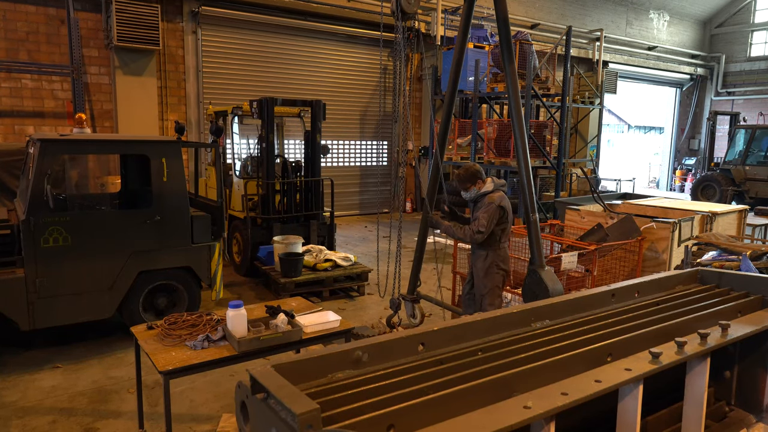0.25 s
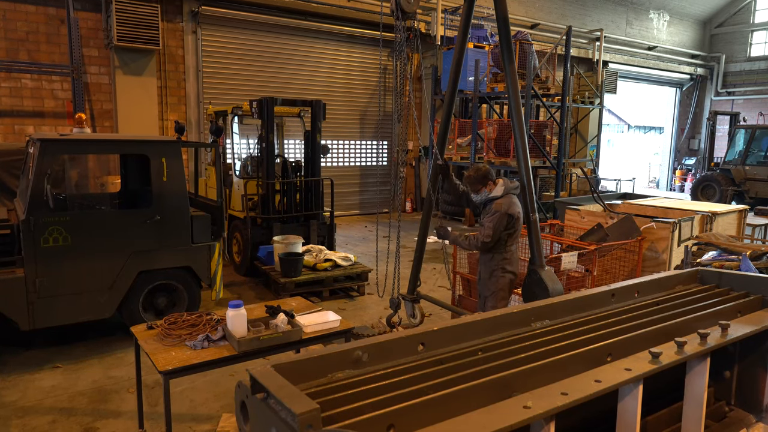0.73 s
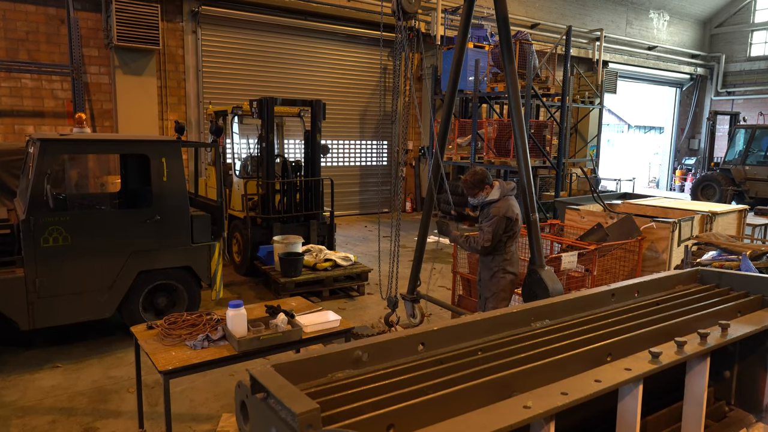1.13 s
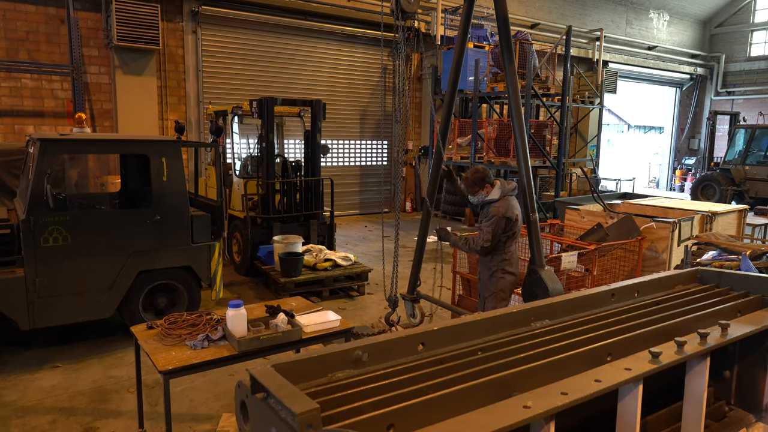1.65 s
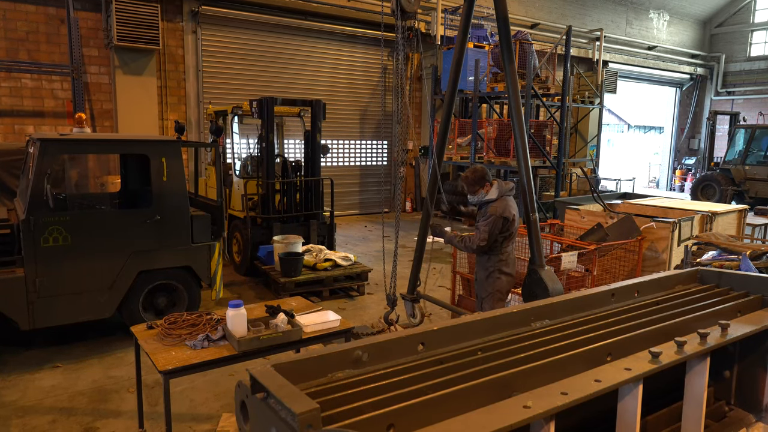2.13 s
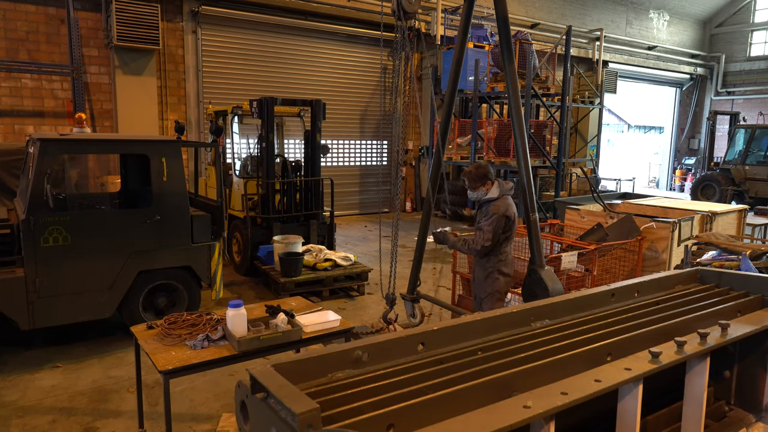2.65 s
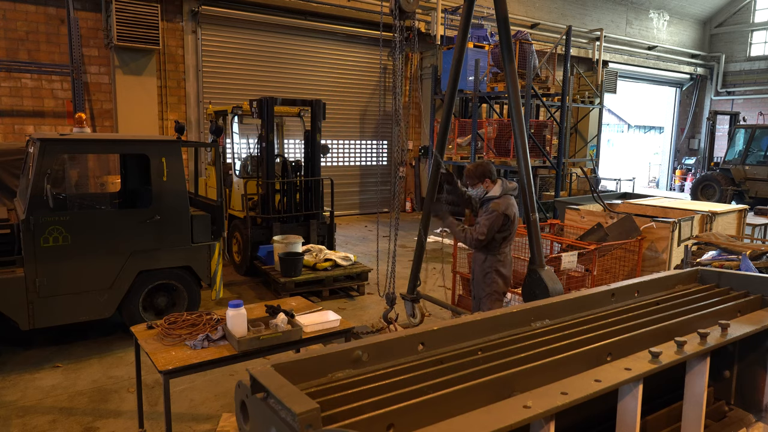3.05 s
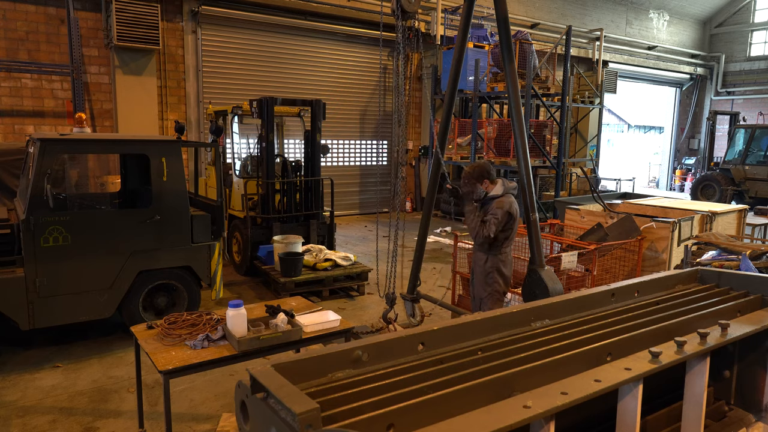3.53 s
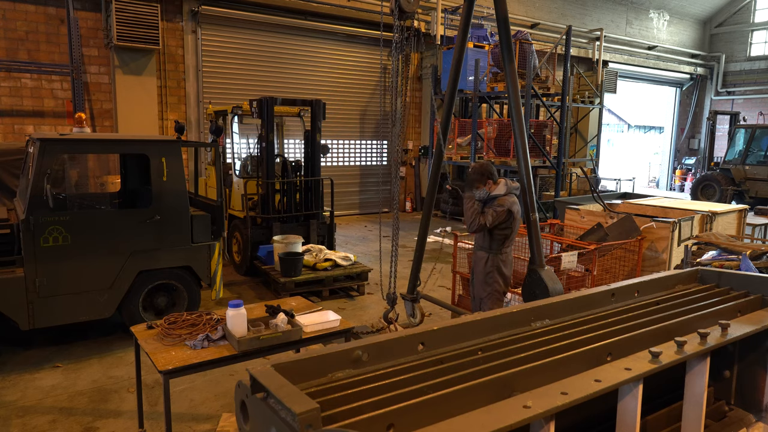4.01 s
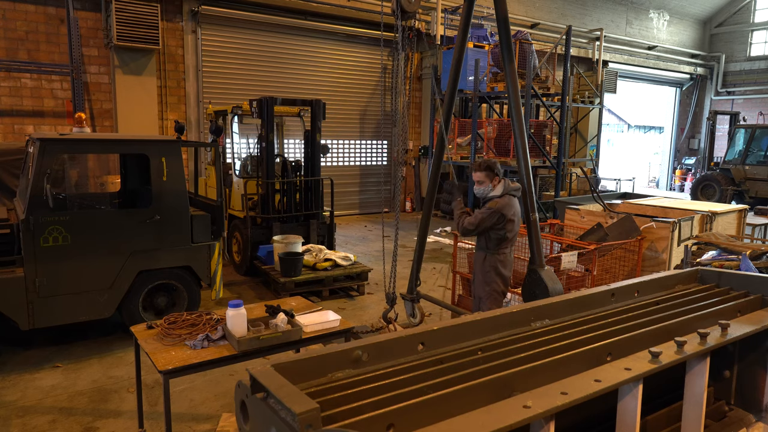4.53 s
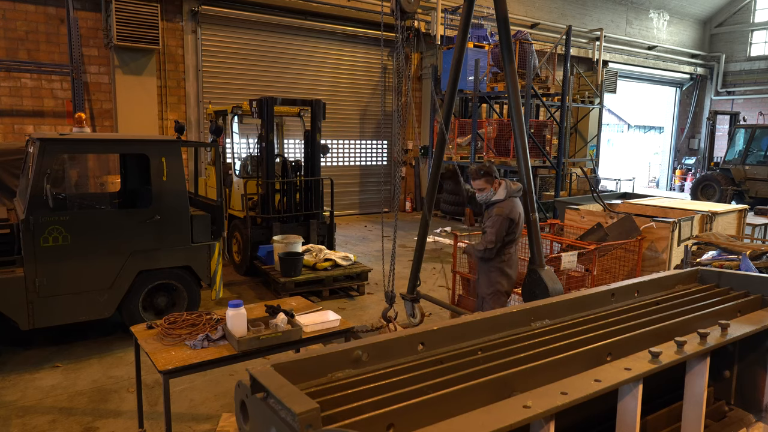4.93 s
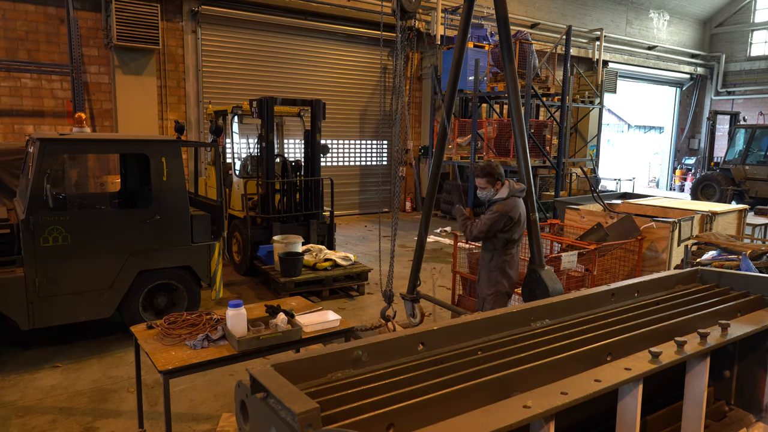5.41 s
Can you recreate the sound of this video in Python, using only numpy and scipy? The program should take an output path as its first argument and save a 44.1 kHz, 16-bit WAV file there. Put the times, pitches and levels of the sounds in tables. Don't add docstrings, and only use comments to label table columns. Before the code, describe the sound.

Metal chain rattle starts almost at once, joined by a pawl clicking in bursts that speed up and slow down with each pull. Hard clinks and hollow tube knocks stand out, especially around two seconds. After a slowing run there is a near-silent pause with small link ticks, then a vigorous clatter to the end. Close, dry detail sits in a big hard-walled hall.

```python
import sys
import numpy as np
from scipy import signal
from scipy.fft import rfft, irfft, next_fast_len
from scipy.io import wavfile
from scipy.ndimage import uniform_filter1d

SR = 44100
rng = np.random.default_rng(int(sys.argv[2]) if len(sys.argv) > 2 else 0)


def to_linear_factor(level_db):
    exponent = np.asarray(level_db, float) / 20
    return 10 ** exponent


def output_pcm(signal):
    pcm = np.clip(np.atleast_2d(signal).T, -1, 1) * 32767
    wavfile.write(sys.argv[1], SR, np.round(pcm).astype(np.int16))


N = 250047


def evened(x):
    return x / np.sqrt(np.mean(x ** 2) + 1e-20)


def read(points, hz):
    f, value = np.transpose(points)
    return np.interp(np.log(hz + 1), np.log(f + 1), value)


def coloured(x, points):
    size = next_fast_len(len(x))
    gain = to_linear_factor(read(points, np.fft.rfftfreq(size, 1 / SR)))
    return irfft(rfft(x, size) * gain, size)[:len(x)]


def above(x, hz):
    return signal.sosfilt(signal.butter(4, hz, "high", fs=SR, output="sos"), x)


def blows(s, size):
    train = np.zeros(N)
    at = np.clip((np.asarray(s) * SR).astype(int), 0, N - 1)
    np.add.at(train, at, size)
    return train


def ring(x, hz, t60):
    r = 1000 ** (-1 / (abs(t60) * SR))
    w = 2 * np.pi * hz / SR
    return signal.lfilter([np.sin(w)], [1, -2 * r * np.cos(w), r * r], x)


def burst(train, t60):
    power = signal.lfilter([1], [1, -1000 ** (-2 / (abs(t60) * SR))], train ** 2)
    return np.sqrt(power) * rng.standard_normal(N)


# frequency in Hz, level in dB.
AIR = [(15, -9.5), (28, 5), (45, -6.5), (60, -11.5), (100, -13), (150, -17.5), (300, -14.5), (700, -16),
       (2000, -28), (4000, -44), (6000, -37), (10000, -44), (16000, -54)]
HUM = [0, -10, -1, 4, -6]
# time in seconds, level in dB.
MOTOR = [(0.0, -73), (0.39, -64), (0.6, -90), (0.95, -73), (1.67, -65), (2.59, -72), (2.76, -93),
         (3.03, -66), (3.87, -66), (4.12, -86), (4.25, -74), (4.59, -68), (5.23, -69), (5.48, -65),
         (5.67, -78)]


def air():
    t = np.arange(N) / SR
    hum_hz = 79.4
    hum = sum(to_linear_factor(db) * np.sin(2 * np.pi * hum_hz * (k + 1) * t + k) for k, db in enumerate(HUM))
    still = evened(coloured(rng.standard_normal(N), AIR))
    return to_linear_factor(-58.5) * still + to_linear_factor(np.interp(t, *np.transpose(MOTOR))) * hum


# time in seconds, speed in teeth a second.
PULLS = [
    [(.106, 28), (.333, 58.4), (.463, 70.9), (.793, 42.6), (.908, 27.7)],
    [(.9085, 31.5), (1.043, 59.5), (1.279, 62.9), (1.561, 25.9), (1.716, 11.5)],
    [(1.7165, 17.8), (1.948, 80.4), (2.088, 92.2), (2.119, 79.2), (2.52, 39.9)],
    [(2.52, 38.4), (2.724, 79.2), (3.085, 35.6), (3.208, 18.8), (3.319, 15.1), (3.474, 11.3)],
    [(4.45, 12.6), (4.649, 63.9), (4.79, 65.7), (4.82, 76.5), (4.994, 88.5), (5.3, 53.7)],
    [(5.3, 68.4), (5.461, 86.6), (5.665, 65.5)],
]


def running(t):
    return sum(np.interp(t, *np.transpose(pull), left=0, right=0) for pull in PULLS) / 60


LAST_TEETH = [
    3.4745,
    4.2483,
    5.665,
]
UNEVEN_S = .001


def teeth():
    times = [LAST_TEETH]
    for pull in PULLS:
        t = np.arange(pull[0][0], pull[-1][0], 1 / SR)
        turned = np.cumsum(np.interp(t, *np.transpose(pull))) / SR
        times.append(np.interp(np.arange(round(turned[-1])), turned, t))
    s = np.sort(np.concatenate(times))
    return s + UNEVEN_S / np.gradient(s) / 60 * rng.standard_normal(len(s))


# frequency in Hz, level in dB.
LINKS = [(1200, -57), (1700, -14), (2130, -9), (2650, -5.5), (3200, 0.5), (3700, 2.5), (4250, -3.5),
         (4800, -5), (5500, -15.5), (7000, -29)]


def clink(hz, t60, luck):
    t = np.arange(4096) / SR
    tones = 0
    for f, db, phase in zip(hz, read(LINKS, hz), luck):
        tones = tones + to_linear_factor(db - 60 * t / t60) * np.sin(2 * np.pi * (f * t + phase))
    return tones * (1 - np.exp(-t / .0002))


# time in seconds, rattle in dB without the wheel's share.
CHAIN = [(0, -55.5), (.08, -58), (.16, -42.5), (.62, -36), (.9, -40.5), (1.39, -35.5), (1.7, -42.5),
         (2.03, -31.5), (2.16, -39), (2.83, -37), (3.1, -38.5), (3.3, -44.5), (3.6, -50.5), (4.07, -66.5),
         (4.27, -71), (4.36, -60), (4.58, -37.5), (5.67, -35)]
# frequency in Hz, level in dB.
RUMBLE = [(59, -62), (100, -18.5), (260, -5.5), (452, -23), (744, -12), (923, -10.5), (1080, -2.5),
          (1350, -7.5), (2500, -5.5), (3250, -37), (5500, -120)]
LEG_HZ = [258, 522, 660, 762, 1083, 1452, 1725, 2122, 2385, 2466, 2842]
# level in dB, t60 in seconds.
LEG = [(2.5, 0.027), (-7, 0.27), (6, 0.015), (-7.5, 0.17), (0, .22), (-37, 0.082), (-8.5, 0.044),
       (-4, 0.22), (-6.5, 0.15), (-2.5, 0.12), (-19.5, 0.14)]
CLINKS_PER_S, CLINK_SPREAD_DB, LINK_T60 = 230, 2.8, .025
JOLT = 0.42
RUN_DB = 1.5
FRAME_DB, FRAME_SHARE, FRAME_RUN_DB = -38.5, 0.46, 7.5


def chain(tooth_s):
    t = np.arange(N) / SR
    swing_db = np.interp(t, *np.transpose(CHAIN))
    run = uniform_filter1d(running(t), size=2000)
    level = to_linear_factor(swing_db + RUN_DB * run)
    frame_level = to_linear_factor(FRAME_DB + FRAME_SHARE * swing_db + FRAME_RUN_DB * np.minimum(run / .4, 1))

    strength = to_linear_factor(CLINK_SPREAD_DB * np.minimum(rng.exponential(1, N), 4))
    knocks = strength * (rng.random(N) < CLINKS_PER_S / SR)
    jolts = signal.lfilter([1], [1, -np.exp(-1 / (0.0093 * SR))], blows(tooth_s, 0.45))
    knocks = knocks * (1 - JOLT + 2 * JOLT * np.minimum(jolts, 1))

    kind = rng.integers(0, 24, N)
    rattle = np.zeros(N)
    for k, (pitch, life, phase) in enumerate(rng.random((24, 3, 7))):
        hz = 1700 * 3.3 ** ((np.arange(7) + pitch) / 7)
        sound = clink(hz, LINK_T60 * (1.0 + life[0]), phase)
        rattle += signal.oaconvolve(knocks * (kind == k), sound)[:N]
    snaps = coloured(burst(knocks, 0.0028), LINKS)

    shake = knocks * rng.standard_normal(N)
    leg = above(sum(to_linear_factor(db) * ring(shake, hz, t60) for hz, (db, t60) in zip(LEG_HZ, LEG)), 226)
    rumble = coloured(burst(knocks, 0.11), RUMBLE)
    links = evened(rattle) + to_linear_factor(-6.0) * evened(snaps)
    frame = to_linear_factor(-1) * evened(leg) + evened(rumble)
    return level * links + frame_level * frame


# time in seconds, peak in
# dB.
TICKS = [(0.0633, -67), (0.0852, -68), (3.6915, -62), (3.701, -58), (3.722, -36), (3.749, -31.5),
         (4, -41.5), (4.007, -48), (4.0448, -51), (4.0944, -64), (4.116, -52), (4.4159, -52)]
# start in seconds, frequency in Hz, level in dB, t60 in seconds.
TICK_RING = [(3.722, 7510, -60, .08), (3.722, 10300, -58, .08), (3.781, 7500, -63, .65),
             (3.75, 7560, -64, .6), (3.722, 4800, -42, .04), (3.723, 5300, -47, .03),
             (1.378, 5400, -25, .04), (4.25, 4180, -47, .6), (4.252, 4260, -50, .5), (0, 3720, -56, .3),
             (0, 3230, -60, .3), (3.8, 10250, -76, .4)]


def ticks():
    s, db = np.transpose(TICKS)
    puffs = burst(blows(s, to_linear_factor(db + 1.5)), 0.0081)
    snap = signal.lfilter(*signal.butter(2, 4500, "high", fs=SR), puffs)
    return snap + sum(ring(blows([s], to_linear_factor(db)), hz, t60) for s, hz, db, t60 in TICK_RING)


# time in seconds, peak in dB, pitch in Hz.
CLINKS = [(.0863, -29.5, 4140), (0.2068, -15.5, 3560), (.3195, -12.5, 3200), (0.3633, -12.5, 3810),
          (0.6504, -11.5, 3020), (1.0239, -12.5, 3940), (1.224, -7.5, 3750), (1.376, -11.5, 4020),
          (1.8293, -12, 3650), (2.0018, -7, 4140), (2.0318, -4, 4060), (2.0617, -6.5, 2900),
          (2.2708, -11, 3650), (2.6366, -12, 3140), (2.8951, -13, 3120), (2.9458, -8.5, 3610),
          (3.0027, -13, 3130), (3.0648, -14.5, 4140), (3.721, -20, 3710), (3.7454, -29, 3650),
          (4.3205, -29, 3640), (4.3939, -32, 3280), (4.502, -16.5, 3650), (4.6553, -11.5, 3270),
          (4.772, -8, 3717), (4.8642, -8, 3804), (4.9227, -16, 3270), (4.9985, -8.5, 3360),
          (5.3949, -5.5, 3630), (5.522, -8, 4050)]
SEAT_HZ = [3150, 3650, 3750, 4200]
TEETH_PER_LINK, SEAT_SCATTER = 2.6, .35
SEAT_DB, SEAT_RUN_DB, SEAT_SPREAD_DB = -23, 7, 4


def seating(tooth_s):
    at = np.arange(TEETH_PER_LINK, len(tooth_s) - 1, TEETH_PER_LINK)
    luck = rng.standard_normal((len(at), 2))
    s = np.interp(at + SEAT_SCATTER * luck[:, 0], np.arange(len(tooth_s)), tooth_s)
    db = SEAT_DB + SEAT_RUN_DB * running(s) + SEAT_SPREAD_DB * np.clip(luck[:, 1], -2, 1.3)
    gap_s = abs(s[:, None] - np.transpose(CLINKS)[0]).min(axis=1)
    free = (gap_s > .018) & (running(s) > .3)
    return np.transpose([s, db, rng.choice(SEAT_HZ, len(s))])[free]


# frequency in Hz, level in dB.
SNAP = [(1000, -30), (2500, -6), (4500, 2), (8000, -6), (16000, -13)]
CLICK_DB, SNAP_T60 = 5, .025


def clinks(tooth_s):
    out = np.zeros(N)
    rows = np.vstack([CLINKS, seating(tooth_s)])
    for (s, db, hz), luck in zip(rows, rng.random((len(rows), 2, 4))):
        tones = hz * np.append(1, .76 + 0.436 * luck[0, 1:])
        sound = clink(tones, .02, luck[1])
        part = out[round(s * SR):][:len(sound)]
        part += to_linear_factor(db - 6.5) * sound[:len(part)] / abs(sound).max()
    s, db, _ = np.transpose(rows)
    contact = signal.butter(1, [2000, 6000], "band", fs=SR)
    click = signal.lfilter(*contact, blows(s, to_linear_factor(db + CLICK_DB)))
    return out + click + to_linear_factor(-14) * coloured(burst(blows(s, to_linear_factor(db)), SNAP_T60), SNAP)


PAWL_HZ = [760, 1460, 2175, 2460, 2928, 3200, 3680, 3855, 3975, 4102, 4278, 4450, 5280, 5722, 6220, 6450,
           7110, 7600, 8300, 9024, 9572, 9702, 9851, 10790, 11600, 12090, 13000, 13320, 14273, 14310, 14292]
# level in dB, t60 in seconds.
PAWL = [(-24, .15), (-23, .1), (-15, .06), (-18, .08), (-12, .05), (-14, .06), (-12, .07), (-10, .09),
        (-17, .2), (-9, .06), (0, .04), (-5, .035), (-16, .05), (-8, .055), (-13, .05), (-14, .05),
        (-18, .06), (-11, .04), (-6, .05), (-11, .06), (-6, .05), (-9, .06), (-8, .06), (-10, .05),
        (-13, .04), (-16, .05), (-14, .05), (-17, .06), (-2, .1), (-4.5, .09), (-18, .5)]
# frequency in Hz, level in dB.
CRACK = [(400, -34), (1500, -22), (4000, -6.5), (7000, 3.5), (10000, 3), (14000, 1.5), (16500, 4)]
PAWL_DB, SPEED_DB, SPREAD_DB = -31, 3, 3
CRACK_DB, CRACK_T60 = -31, .045
BOUNCE_S, BOUNCE_DB = .006, -7.5


def pawl(s):
    force = to_linear_factor(SPEED_DB / np.gradient(s) / 60)
    s = np.append(s, s + BOUNCE_S)
    force = np.append(force, force * to_linear_factor(BOUNCE_DB))
    luck = rng.standard_normal((len(s), len(PAWL), 3))
    force = force * to_linear_factor(0.56 * luck[:, 0, 2])
    share = to_linear_factor(SPREAD_DB * np.clip(luck[..., 0], -1, 1))
    late = .0006 * abs(luck[..., 1])
    tones = np.zeros(N)
    for k, (db, t60) in enumerate(PAWL):
        struck = blows(s + late[:, k], force * share[:, k])
        tones += to_linear_factor(db) * ring(struck, PAWL_HZ[k], t60)
    crack = coloured(burst(blows(s, force), CRACK_T60), CRACK)
    return above(to_linear_factor(PAWL_DB) * tones + to_linear_factor(CRACK_DB) * crack, 650)


# time in seconds, ring in dB, low modes in dB, high modes in dB.
SLAPS = [(0.629, -35, -19, 4.5), (0.6809, -25, -11, -3.5), (1.2894, -40, 9, 8), (1.3302, -29, -5, -2),
         (1.3931, -31, -2, 0), (1.9728, -33, 2, 0), (1.979, -33, -4, 9), (2.011, -29.5, 1.5, 3),
         (2.0415, -33, 2, 5), (2.0594, -35, 1, 0), (2.7495, -34.5, 0.5, -9), (2.802, -23.5, -7, 0),
         (3.7532, -53.5, 4.5, -11), (4.2487, -54, 6.5, 8), (4.451, -51, -2.5, 6), (4.502, -45, -2, 7),
         (2.0323, -31, -9.5, 0), (3.8351, -62.5, 9, -3), (5.081, -25, -2.5, 2), (5.1505, -32, -3.5, -12),
         (5.3793, -30.5, -1.5, 5), (5.4114, -32, -1, 3)]
THUD_DB = 16


def slaps():
    s, db, low_db, high_db = np.transpose(SLAPS)
    tube = np.zeros(N)
    for hz, (mode_db, t60) in zip(LEG_HZ, LEG):
        share_db = low_db if hz < 900 else high_db if hz > 1200 else 0
        tube += ring(blows(s, to_linear_factor(db + mode_db + share_db)), hz, t60)
    body = signal.butter(2, [550, 1400], "band", fs=SR)
    thud = signal.lfilter(*body, burst(blows(s, to_linear_factor(db + low_db)), .04))
    return above(to_linear_factor(-1.0) * tube + to_linear_factor(THUD_DB) * thud, 643)


# delay in seconds, level in dB.
ECHOES = [
    (.0068, -27.5),
    (0.012, -14),
    (0.022, -14.5),
    (.03, -18.5),
]
# frequency in Hz, t60 in seconds.
HALL = [(200, 3.8), (1000, 0.98), (4000, 1.41), (9000, 0.55), (15000, 0.16)]
HALL_DB = -9.5


def hall(x):
    hz, t, z = signal.stft(rng.standard_normal(2 * SR), SR, nperseg=256)
    decay = to_linear_factor(-60 * t / read(HALL, hz)[:, None])
    build_up = np.minimum(t / 0.037, 1)
    tail = signal.istft(z * decay * build_up, SR, nperseg=256)[1]
    tail *= to_linear_factor(HALL_DB) / np.linalg.norm(tail)
    tail[0] += 1
    for s, db in ECHOES:
        tail[round(s * SR)] += to_linear_factor(db)
    return signal.fftconvolve(x, tail)[:N]


def scene():
    tooth_s = teeth()
    hoist = chain(tooth_s) + ticks() + clinks(tooth_s) + pawl(tooth_s) + slaps()
    return (hall(hoist) + air())[None]


def low_pass(x):
    return signal.sosfilt(signal.butter(12, 16350, fs=SR, output="sos"), x)


def record(dry):
    edge = signal.firwin(255, 15750, window=("kaiser", 8), fs=SR)
    mix = signal.oaconvolve(dry, edge[None], "same")
    return low_pass(mix)


dry = scene()
out = record(dry)
output_pcm(out)
```